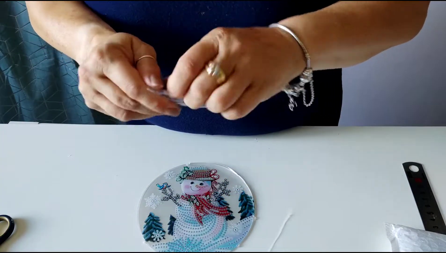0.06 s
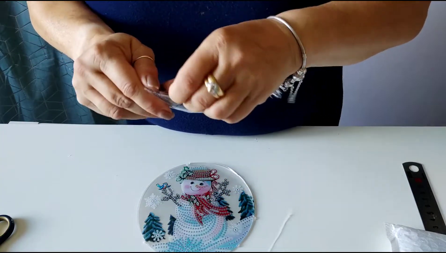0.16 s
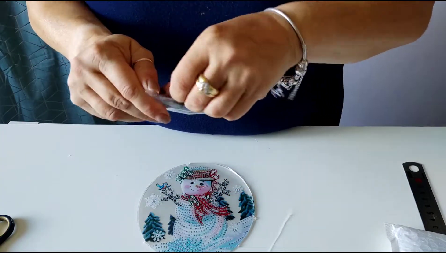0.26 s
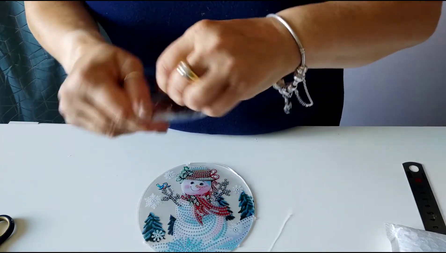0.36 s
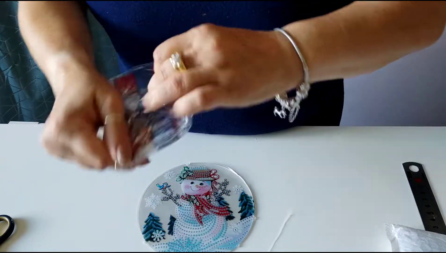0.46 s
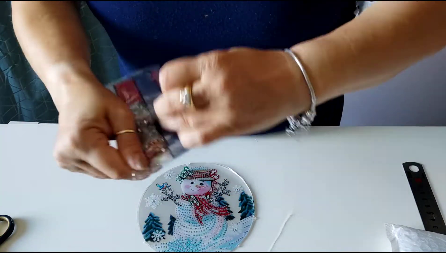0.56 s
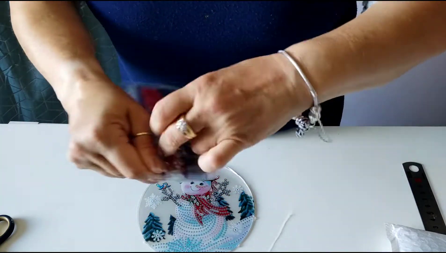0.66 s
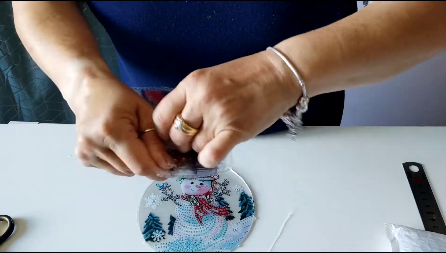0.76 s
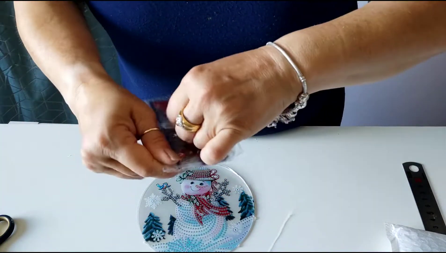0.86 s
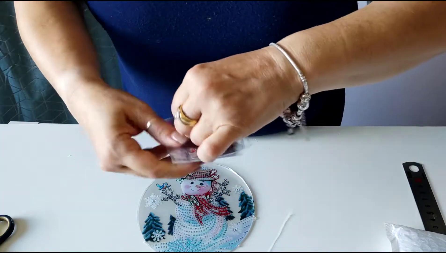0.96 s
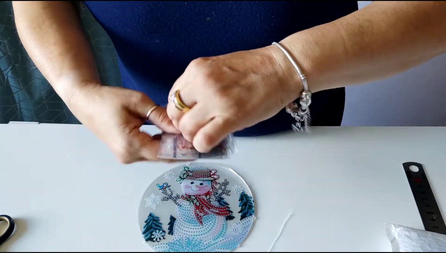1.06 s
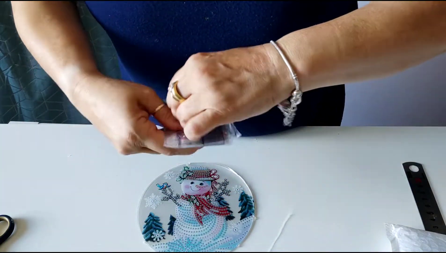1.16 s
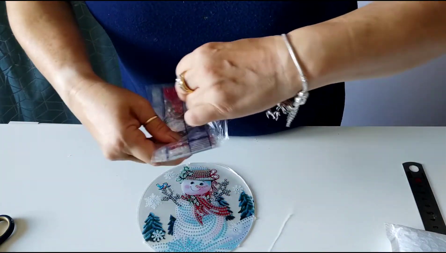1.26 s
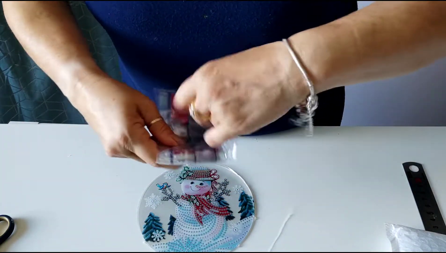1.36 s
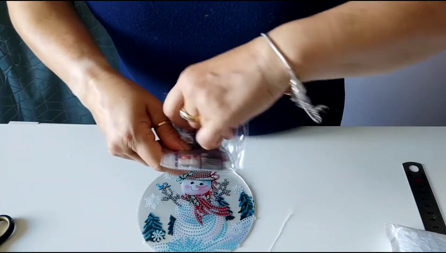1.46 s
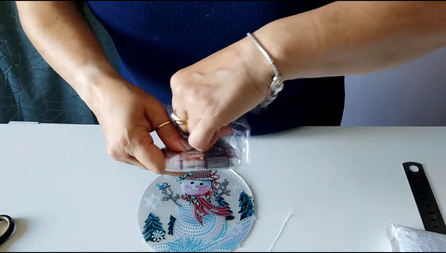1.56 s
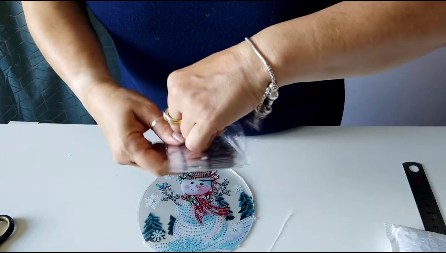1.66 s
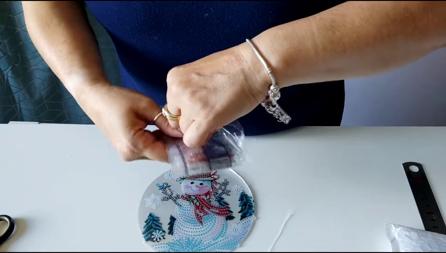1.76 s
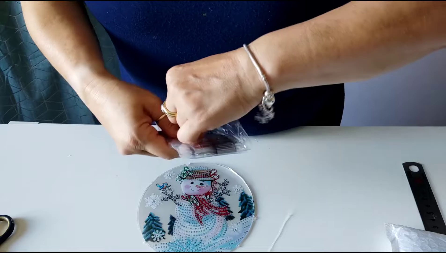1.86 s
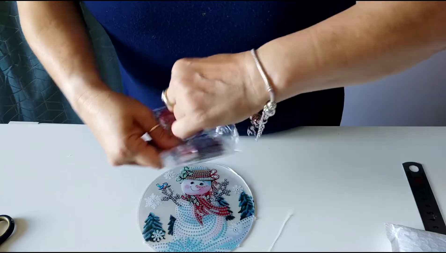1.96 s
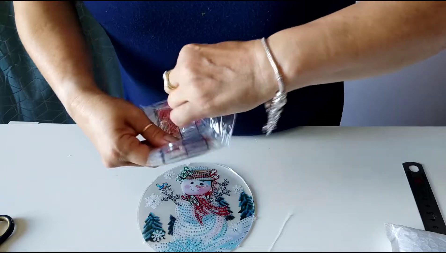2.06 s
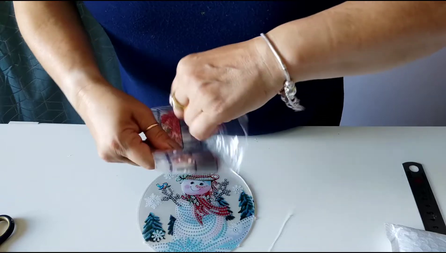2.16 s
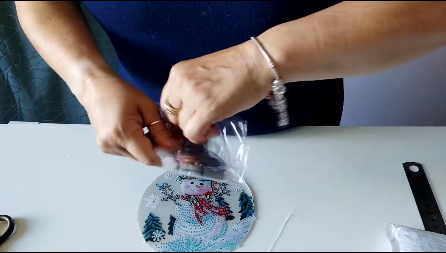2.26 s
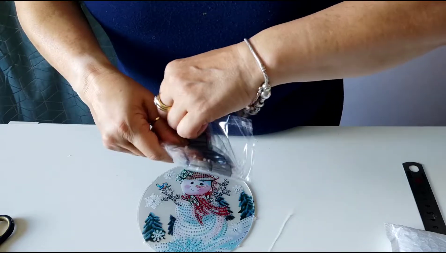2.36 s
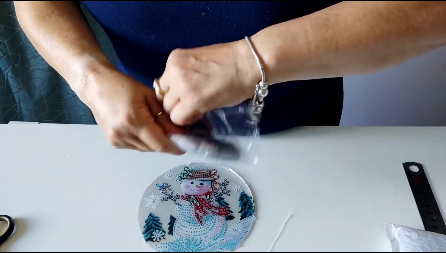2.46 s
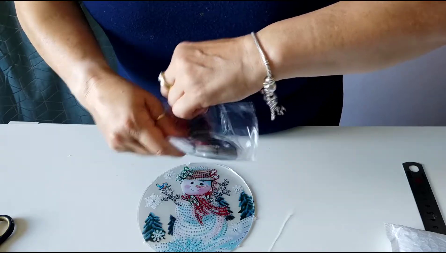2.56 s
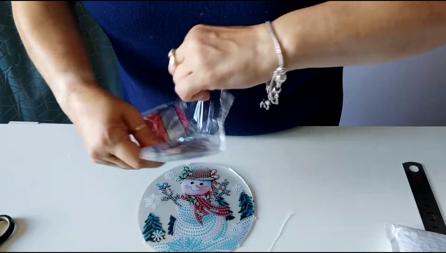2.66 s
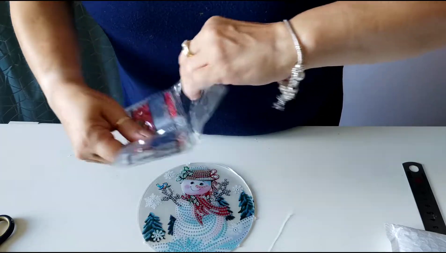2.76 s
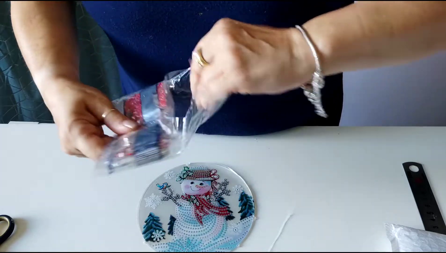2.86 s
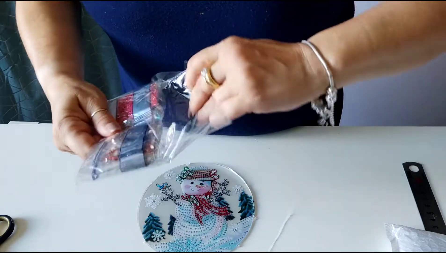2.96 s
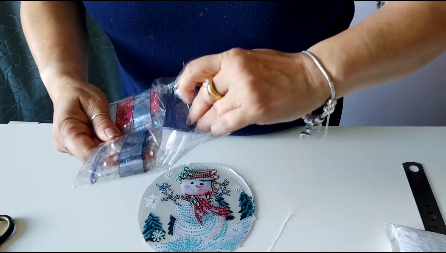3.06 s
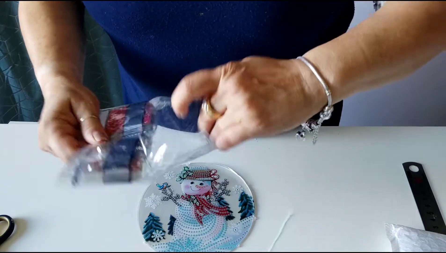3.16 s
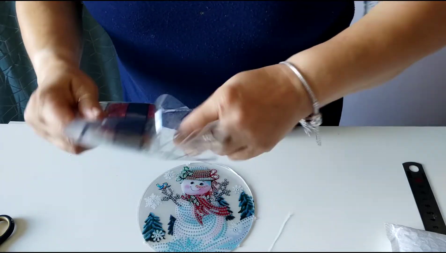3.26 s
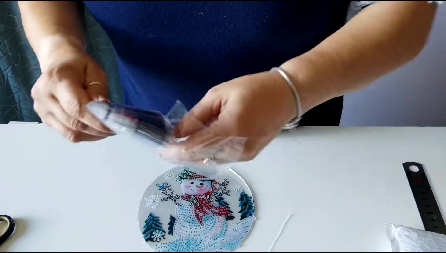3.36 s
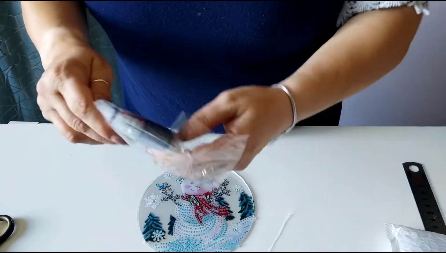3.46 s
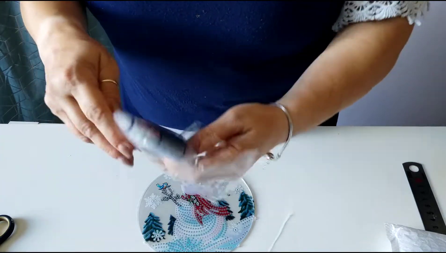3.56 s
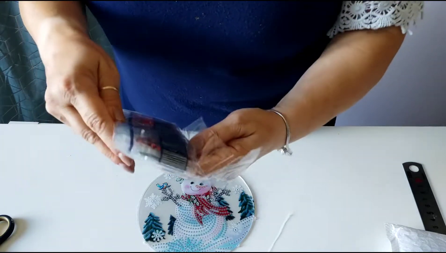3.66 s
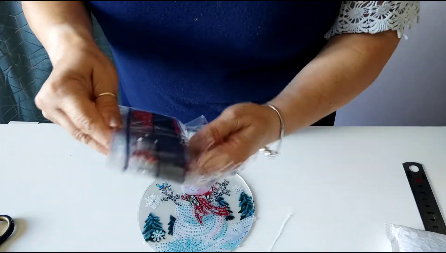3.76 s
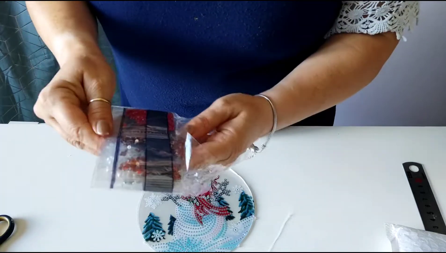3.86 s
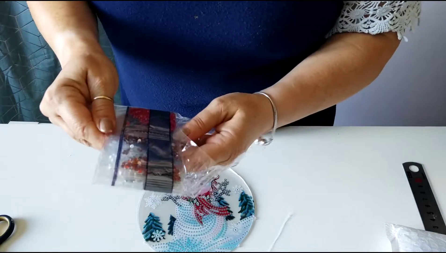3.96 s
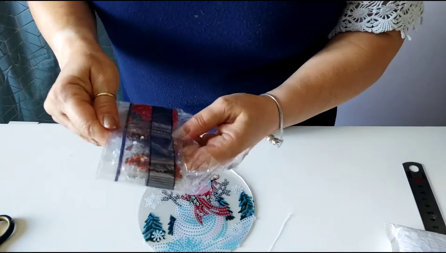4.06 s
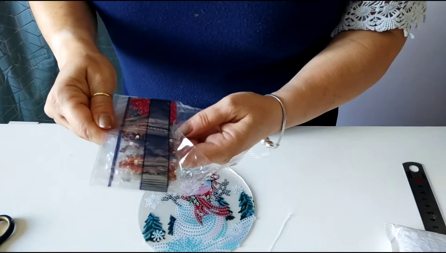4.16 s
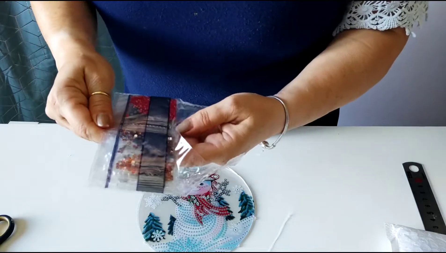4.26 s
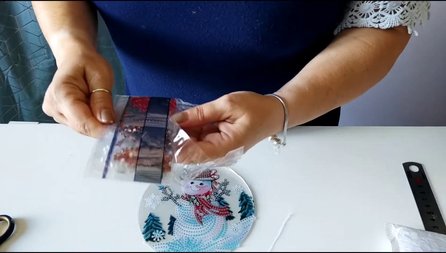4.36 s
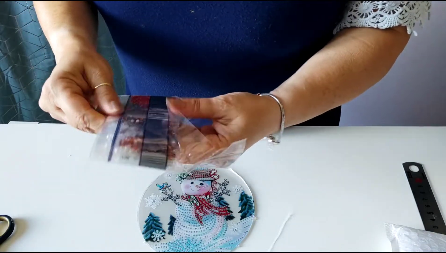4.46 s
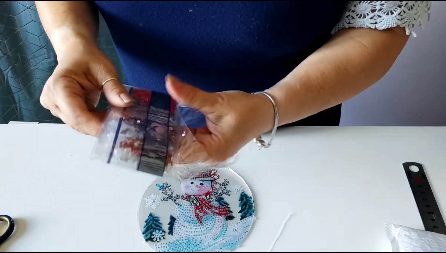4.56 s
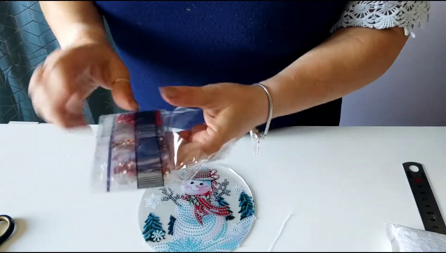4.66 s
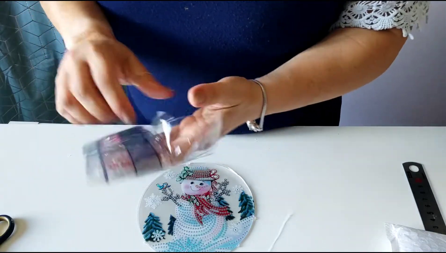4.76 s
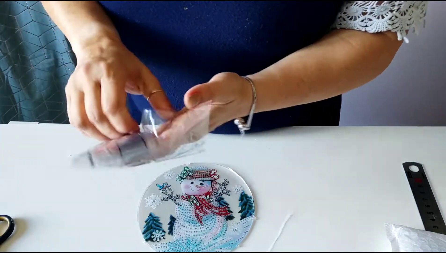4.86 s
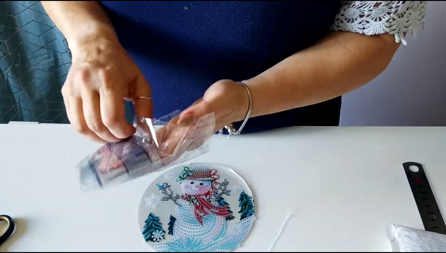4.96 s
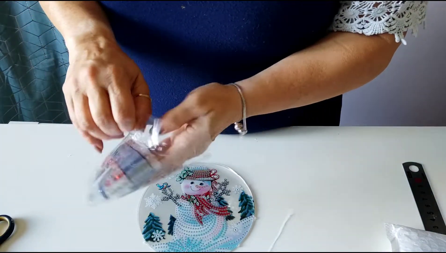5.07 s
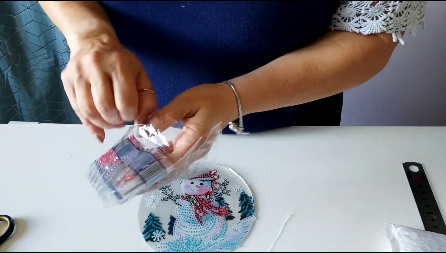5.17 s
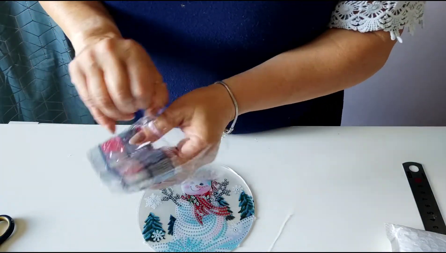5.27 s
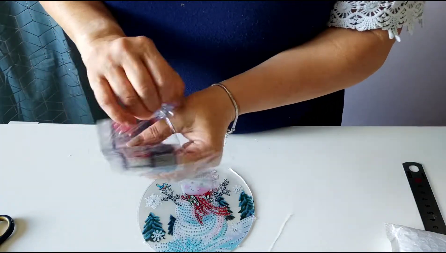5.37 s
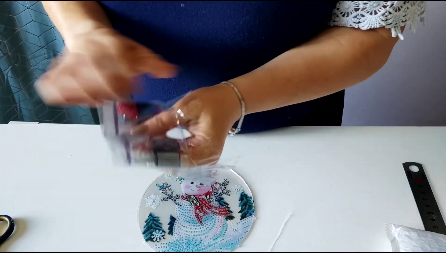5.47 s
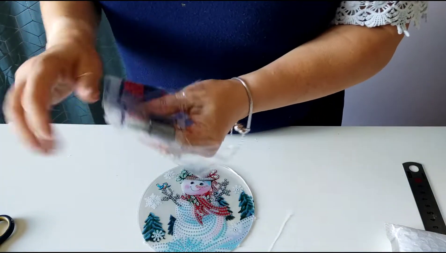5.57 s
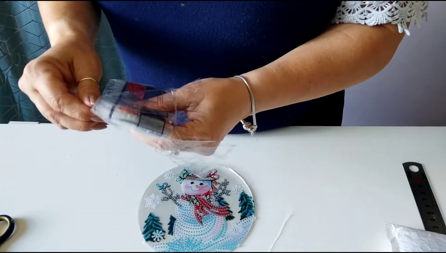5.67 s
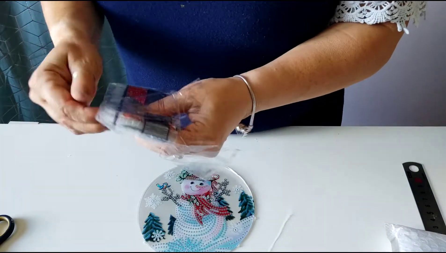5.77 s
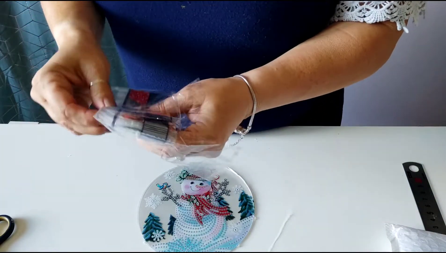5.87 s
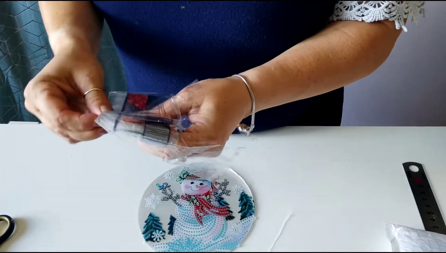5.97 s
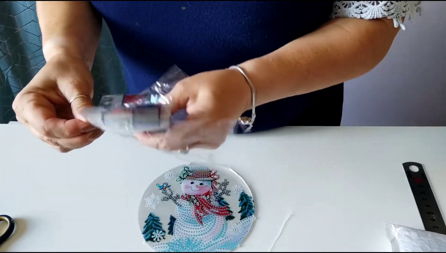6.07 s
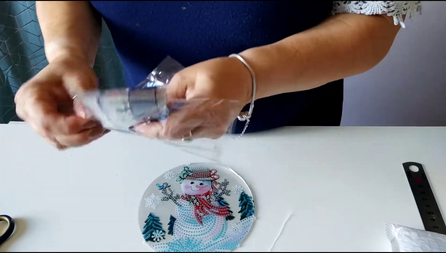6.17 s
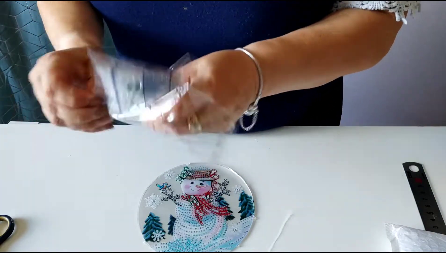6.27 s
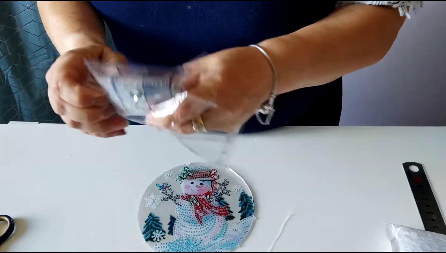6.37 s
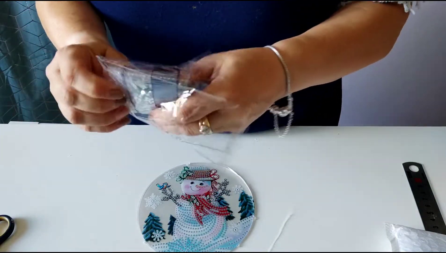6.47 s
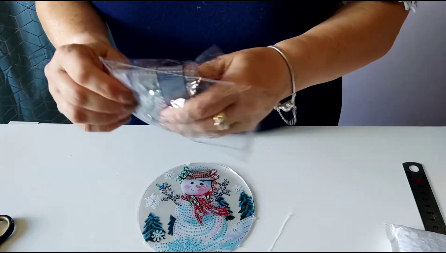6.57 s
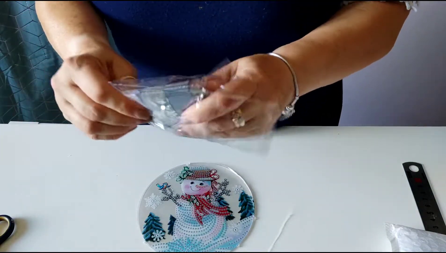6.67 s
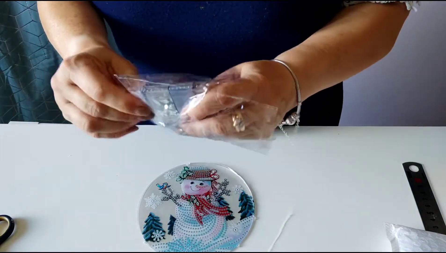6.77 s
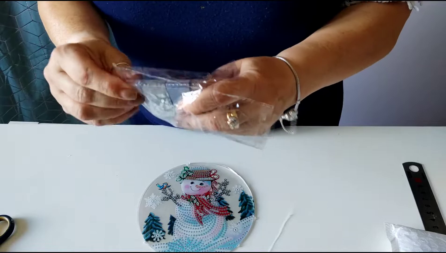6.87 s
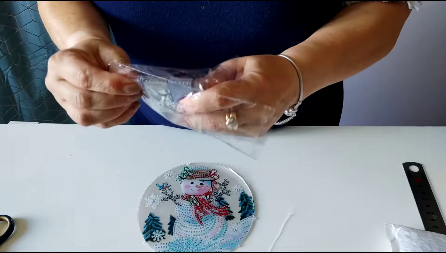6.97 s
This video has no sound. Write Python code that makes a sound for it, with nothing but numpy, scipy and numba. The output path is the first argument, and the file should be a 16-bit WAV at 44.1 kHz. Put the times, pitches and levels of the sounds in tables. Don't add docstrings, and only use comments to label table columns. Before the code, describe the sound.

Close stereo sound of hands kneading a thin, stiff plastic bag above a table in a small room. A sharp snap comes at once, then light crackle, until a very loud, ringing snap in a dense squeeze at about 0.5 s. Hard, uneven squeezes continue to 2.4 s, with clumps of brittle ticks and strong cracks near 1.3 and 1.85 s. After a brief lull, a deep, whole-bag pop lands at 2.65 s, trailed by smaller snaps. From 3 to 5 s the handling is gentler and sparser, with scattered crinkles and short pauses. Firm squeezes return around 5.2 and 5.5 s, ease, then thicken after 6.1 s, with a bright loud snap near 6.6 s and crackling to the end. The tone is bright and piercing, with short reflections and faint low room air.

```python
import sys
import numpy as np
from scipy import signal
from scipy.fft import rfft, irfft
from scipy.io import wavfile
from scipy.ndimage import uniform_filter1d
from numba import njit

SR = 44100
rng = np.random.default_rng(int(sys.argv[2]) if len(sys.argv) > 2 else 0)


def linear_from_db(decibels):
    return 10 ** (np.asarray(decibels, float) / 20)


def unload_wav(signal):
    wavfile.write(
        sys.argv[1],
        SR,
        np.round(np.clip(np.atleast_2d(signal).T, -1, 1) * 32767).astype(np.int16),
    )


N = 309582

CREASES = 96
LEAD_S = 0.002


def snaps(shapes):
    s, tick_db, push_db, facet_db = large()
    draws = rng.random((len(s), 4))
    pan_db = 2.8 * (draws[:, 1] - 0.5)
    push_db = push_db + 2.8 * (draws[:, 2] - 0.5)
    facet_db = facet_db + 4.3 * (draws[:, 3] - 0.5)
    gains = part_gains(tick_db - 0.5, push_db, facet_db, pan_db)
    at = np.maximum(np.round((s - LEAD_S) * SR), 0).astype(np.int64)
    which = (draws[:, 0] * CREASES).astype(np.int64)
    return scatter(at, which, gains, shapes, N)


def large():
    # onset t/s, tick peak level/dB
    crisp = [(0.0034, -17), (0.031, -8.5), (0.2834, -15.5), (0.3624, -21.5), (0.383, -20), (0.4383, -15.5),
             (0.6902, -13), (0.7004, -32), (1.5686, -18.5), (1.5805, -15.5), (1.8507, -9), (2.4306, -22.5),
             (3.3877, -15.5), (3.5795, -19), (3.721, -19.5), (3.971, -16.5), (4.0338, -20.5), (4.138, -17),
             (4.354, -22), (4.4109, -27), (4.5073, -19.5), (5.0579, -26.5), (5.136, -22.5), (5.314, -23),
             (5.8107, -25.5), (6.0855, -22.5), (6.1683, -14.5), (6.3659, -22), (6.8094, -33),
             (6.9625, -14.5)]
    plain = [(0.1653, -28), (0.3978, -25), (0.4957, -27), (0.6416, -26.5), (0.9403, -20), (1.2454, -16),
             (1.8017, -25.5), (2.5322, -15.5), (2.729, -16), (2.8882, -22.5), (2.9118, -21), (2.9668, -18),
             (3.67, -21), (3.8427, -24), (3.8817, -22), (4.3317, -25), (4.6083, -20.5), (4.6888, -22),
             (4.744, -29), (4.9495, -40), (5.1974, -16.5), (5.4358, -20), (5.6034, -26), (5.7515, -22.5),
             (5.8562, -21), (6.3464, -20.5), (6.425, -16.5), (6.5025, -18), (6.577, -10), (6.6206, -19.5)]
    ringing = [(0.1522, -23.5), (0.4903, -20), (0.518, -16), (0.5406, -6.5), (0.5866, -23), (0.863, -25.5),
               (1.0226, -16.5), (1.1035, -18.5), (1.278, -14.5), (1.3909, -19), (1.8174, -16),
               (2.3983, -20), (2.625, -23), (2.7338, -14.5), (2.816, -14), (2.876, -22), (3.1183, -19),
               (3.1696, -22), (3.3195, -23), (3.46, -18.5), (3.9559, -18), (4.0577, -22), (5.1473, -23.5),
               (5.2402, -20.5), (5.2548, -29), (5.3516, -19.5), (5.9656, -18), (6.2786, -24.5),
               (6.6511, -21.5), (6.7988, -20)]
    deep = [(0.1386, -22), (0.6207, -13.5), (0.6771, -15.5), (1.1384, -18), (1.1554, -25.5), (1.2884, -13),
            (1.3298, -13.5), (1.3348, -19), (1.3386, -19.5), (1.4382, -19.5), (2.159, -20), (2.165, -20.5),
            (2.197, -21), (2.2122, -22), (2.28, -24), (2.4678, -29), (2.6445, -24), (2.6499, -5),
            (2.6818, -11), (2.7678, -22.5), (2.8274, -20), (2.831, -22.5), (3.0021, -18.5), (3.0517, -15.5),
            (3.1216, -21), (3.1563, -12), (5.228, -13.5), (5.4851, -15.5), (5.686, -37.5), (6.7548, -22.5)]
    # bag push re tick/dB, facet ring re tick/dB
    kinds = [
        (-40.5, -20),
        (-24.5, -13.5),
        (-23.5, -8.5),
        (-15, -10.5),
    ]
    peak_after_s = 0.0009
    rows = []
    for folds, colour in zip((crisp, plain, ringing, deep), kinds):
        for s, db in folds:
            rows.append((s + peak_after_s, db + 1.5, *colour))
    return np.transpose(rows)


def crackle(shapes, per_s=1000., spread_db=4.5, clump_db=2.5):
    # t/s, push re crackle/dB
    slack = [(0, -24), (.5, -24.5), (.7, -17.5), (1.15, -22.5), (1.5, -13.5), (1.9, -22.5), (2.2, -14.5),
             (2.8, -11.5), (3.3, -12.5), (3.6, -21.5), (4.0, -14.5), (4.5, -20.5), (4.8, -14), (5.5, -17),
             (6.0, -18.5), (6.4, -18), (6.75, -17), (7.02, -20.5)]
    draws = rng.random((N, 6))
    clump = uniform_filter1d(uniform_filter1d(rng.standard_normal(N), 500), 500)
    at = np.flatnonzero(draws[:, 0] < per_s / SR)
    tick_db = knead(at / SR)
    slack_db = np.interp(at / SR, *np.transpose(slack))
    facet_db = -11 + 0.1 * (slack_db + 16)
    size_db = -spread_db * np.log(np.maximum(draws[at, 1], 0.02))
    size_db = size_db + clump_db * clump[at] / clump.std() + unrest()[at]
    push_db = slack_db - 2.5 + 6.2 * (draws[at, 2] - 0.5)
    facet_db = facet_db + 9.9 * (draws[at, 3] - 0.5)
    pan_db = 16.8 * (draws[at, 4] - 0.5)
    gains = part_gains(tick_db + size_db - 11.5, push_db, facet_db, pan_db)
    which = (draws[at, 5] * CREASES).astype(np.int64)
    return scatter(at, which, gains, shapes, N)


def knead(t):
    # full force t/s, crackle level/dB, 20 dB build time/s, 20 dB ease time/s
    squeezes = [(.0, -44, .1, .12), (.16, -31, 0.24, 0.36), (.40, -41, -1.5, 3.5), (0.539, -21, 0.14, 0.13),
                (0.688, -30, -0.47, 0.26), (1.032, -28, 0.2, 0.12), (1.27, -22, 0.07, 0.3),
                (1.668, -27.5, 0.05, 0.23), (1.881, -32, -0.8, 0.04), (2.041, -23.5, 0.14, 0.23),
                (2.239, -31.5, -0.57, 0.4), (2.41, -44, -1, 1), (2.656, -31.5, 0.13, 0.1),
                (3.0, -38, 0.4, 0.2), (3.179, -39, 0.4, 0.26), (3.42, -32.5, .1, 0.34),
                (3.59, -34.5, 0.46, 0.16), (3.87, -36, 0.3, 0.17), (4.222, -41, 0.5, .1),
                (4.392, -38, -0.05, -0.53), (4.61, -29.5, 0.14, 0.24), (4.84, -46, .15, .2),
                (5.0, -40, .2, 0.45), (5.23, -29, 0.1, 0.19), (5.49, -26, 0.23, 0.12),
                (5.972, -38, 0.44, 0.14), (6.152, -22.5, 0.08, 0.11), (6.368, -23.5, .12, 0.37),
                (6.578, -29, 0.17, -0.85), (6.798, -24.5, 0.17, .5)]
    rest_db = -59
    s, db, build_s, ease_s = np.transpose(squeezes)[:, :, None]
    building = (s - t) / np.maximum(build_s, 0.02)
    easing = (t - s) / np.maximum(ease_s, 0.02)
    away = np.where(t < s, building, easing)
    return 10 * np.log10((linear_from_db(db - 20 * away) ** 2).sum(0) + linear_from_db(rest_db) ** 2)


def unrest():
    s, tick_db = large()[:2]
    kicks = np.zeros(N)
    kicks[np.round(s * SR).astype(int)] = np.clip(tick_db - knead(s) - 8.5, 0, 30)
    settle, tense = np.exp(-1 / (0.042 * SR)), np.exp(-1 / (0.0015 * SR))
    after = signal.lfilter([1], [1, -settle], kicks)
    before = signal.lfilter([1], [1, -tense], kicks[::-1])[::-1] - kicks
    return np.clip(0.37 * after - 0.051 * before, -25, 15)


def creases(size=640):
    t = np.arange(size) / SR
    slips = rng.standard_normal((3, CREASES, size)) * (rng.random((CREASES, size)) < 4500 / SR)
    slips *= linear_from_db(-60 * np.where(t < LEAD_S, (LEAD_S - t) / 0.0059, (t - LEAD_S) / 0.0089))
    slips[0, :, round(LEAD_S * SR)] = 1.98
    ticks = slips[0] + slips[1:]
    blunt = 0.75 * rng.random((CREASES, 1))
    ticks = ticks + blunt * np.roll(ticks, 1, axis=2) + blunt ** 2 * np.roll(ticks, 2, axis=2)
    ticks = signal.sosfilt(signal.butter(2, 3800., "high", fs=SR, output="sos"), ticks)
    facet = rings(1226, 3860, 1.79, t - 0.001)
    facet_own = rings(1050, 5000, 1.2, t - 0.001)
    push = rings(228.4, 1102, 1.7, t)
    push_own = rings(195, 1100, 0.26, t)
    left = np.stack([ticks[0], facet + 0.35 * facet_own, push + 0.15 * push_own], axis=1)
    right = np.stack([ticks[1], facet - 0.021 * facet_own, push - 0.11 * push_own], axis=1)
    lags = rng.integers(0, 5, CREASES)
    left = np.array([np.roll(shape, lag, axis=1) for shape, lag in zip(left, lags)])
    shapes = np.stack([left, right], axis=2) * np.cos(np.pi / 2 * t / t[-1])
    heard = signal.fftconvolve(shapes, ports()[None, None], axes=3)
    peak = uniform_filter1d(2 * (heard ** 2).mean(2), size=40).max(2)
    return shapes / np.sqrt(peak)[:, :, None, None]


def rings(low_hz, high_hz, cycles, t):
    hz = low_hz * (high_hz / low_hz) ** rng.random((CREASES, 3, 1))
    delay_s = 0.002503 * rng.random((CREASES, 3, 1))
    turns = hz * np.maximum(t - delay_s, 0)
    envelope = (1 - np.exp(-turns / 0.31)) * np.exp(-turns / cycles)
    ring = (np.sin(2 * np.pi * turns) * envelope).sum(1)
    return ring / abs(ring).max(1, keepdims=True)


def part_gains(tick_db, push_db, facet_db, pan_db):
    parts_db = np.stack([tick_db, tick_db + facet_db, tick_db + push_db], axis=1)
    sides_db = np.outer(pan_db, [0.5, -0.5])
    return linear_from_db(parts_db[:, :, None] + sides_db[:, None])


@njit
def scatter(at, which, gains, shapes, length):
    size = shapes.shape[3]
    out = np.zeros((2, length + size))
    for k in range(len(at)):
        for part in range(3):
            for port in range(2):
                out[port, at[k]:at[k] + size] += gains[k, part, port] * shapes[which[k], part, port]
    return out[:, :length]


def ports():
    # f/Hz, gain/dB
    left_port = [(60, -26), (300, -17.5), (900, -0.5), (5500, 12), (7000, 20), (8300, 25), (9000, 20),
                 (9700, 2.5), (12000, 0), (16000, -2.5)]
    right_port = [(60, -24.5), (300, -22), (900, -3), (5000, 13), (6500, 21), (7350, 31), (8200, 23.5),
                  (9700, 6), (12000, 0), (16000, -8)]
    return np.array([causal(left_port), causal(right_port)])


def causal(points, size=2048):
    log_gain = np.log(linear_from_db(read(points, abs(np.fft.fftfreq(size, 1 / SR)))))
    spectrum = np.exp(np.conj(signal.hilbert(log_gain)))
    return np.fft.ifft(spectrum).real[:size // 2]


def read(points, hz):
    f, value = np.transpose(points)
    return np.interp(np.log(hz + 1), np.log(f + 1), value)


def room(x):
    # f/Hz, t60/s
    room_t60 = [(250, 0.32), (1000, 0.14), (4000, 0.24), (12000, 0.19)]
    taps = np.zeros((2, SR // 2))
    places = np.arange(120, SR // 2 - 20, 20)
    at = places + rng.integers(0, 20, (2, len(places)))
    np.put_along_axis(taps, at, rng.choice([-1., 1.], at.shape), 1)
    hz, t, z = signal.stft(taps, SR, nperseg=256)
    t60_s = np.maximum(read(room_t60, hz), 0.02)[:, None]
    tail = signal.istft(z * linear_from_db(-60 * t / t60_s), SR, nperseg=256)[1]
    return signal.fftconvolve(x.mean(0)[None], tail / np.linalg.norm(tail[0]), axes=1)[:, :N]


def hush():
    # f/Hz, density/dB per Hz
    air_spectrum = [(20, 8.5), (50, -5), (150, -10), (800, -32), (6000, -99), (16000, -59)]
    colour = linear_from_db(read(air_spectrum, np.fft.rfftfreq(N, 1 / SR)))
    noise = irfft(rfft(rng.standard_normal((2, N))) * colour, N)
    return linear_from_db(-42.0) * noise / noise.std()


def scene():
    shapes = creases()
    bag = snaps(shapes) + crackle(shapes)
    table = np.pad(bag, ((0, 0), (round(0.0011 * SR), 0)))[:, :N]
    return bag + linear_from_db(-23.5) * table + linear_from_db(-6.5) * room(bag) + hush()


def roll_off(x):
    return signal.sosfilt(signal.butter(12, 16000, fs=SR, output="sos"), x)


def record(dry):
    heard = signal.oaconvolve(dry, ports(), axes=1)[:, :N]
    rounded = 0.97 * np.tanh(heard / 0.97)
    limit = signal.firwin(129, 16300, fs=SR)[None]
    return roll_off(signal.oaconvolve(rounded, limit, "same"))


dry = scene()
out = record(dry)
unload_wav(out)
```